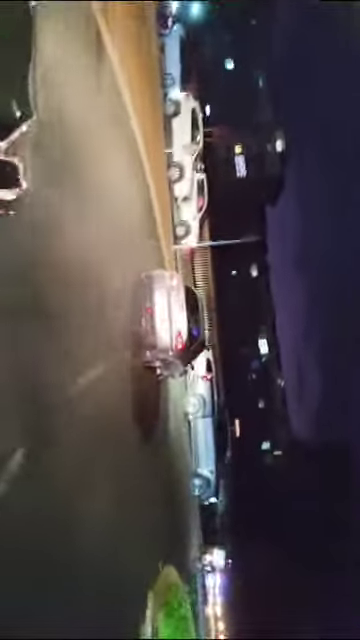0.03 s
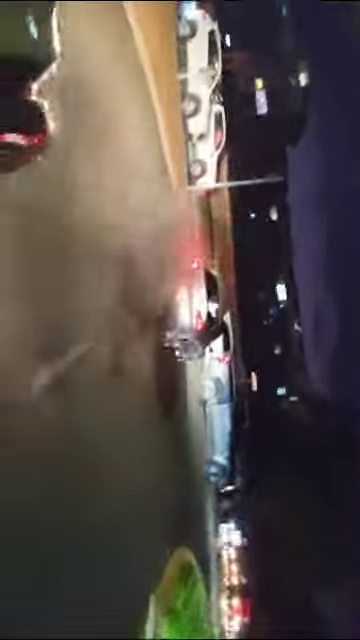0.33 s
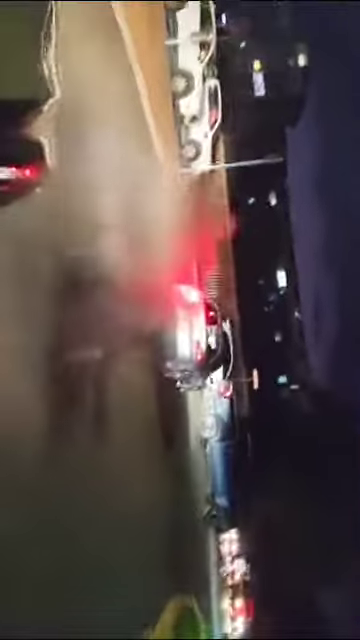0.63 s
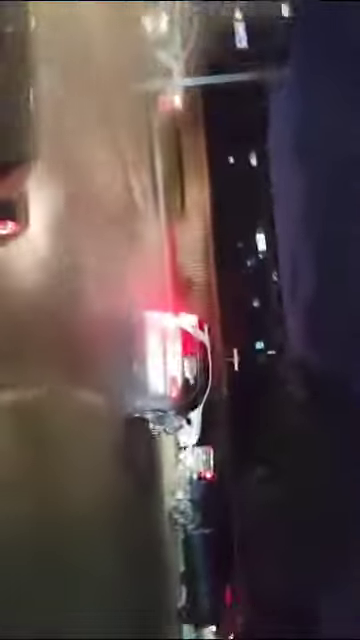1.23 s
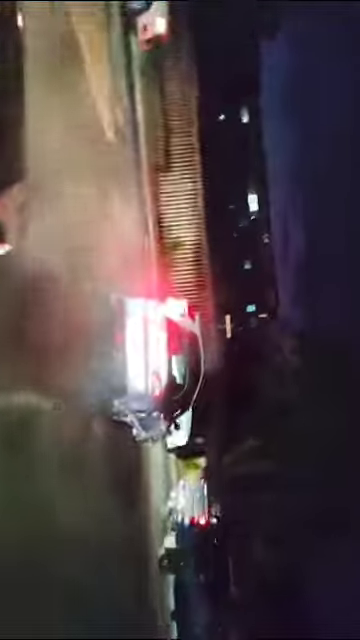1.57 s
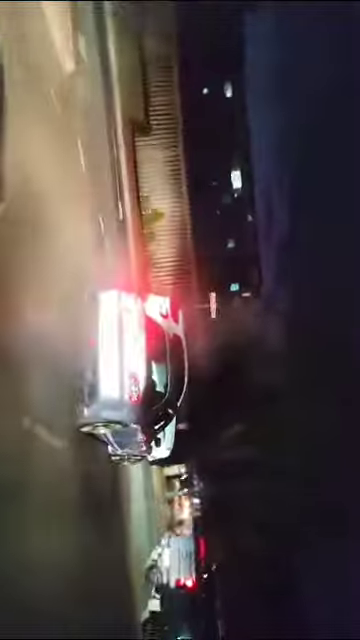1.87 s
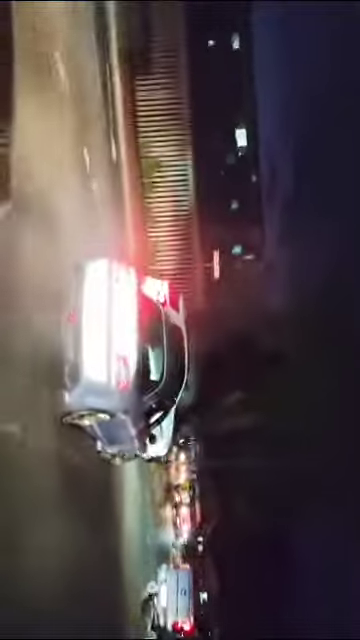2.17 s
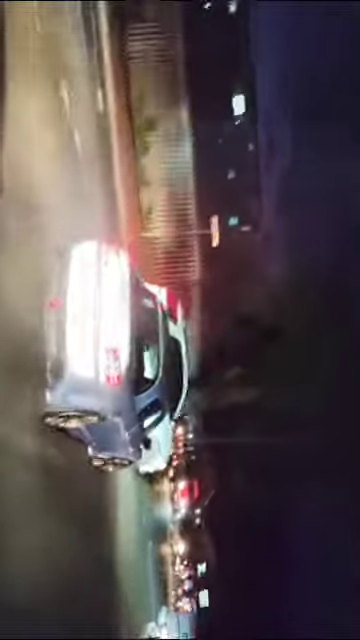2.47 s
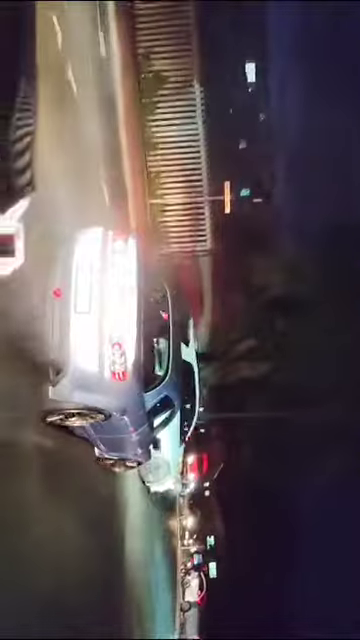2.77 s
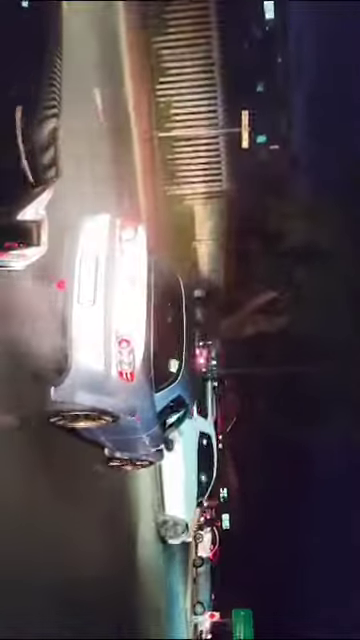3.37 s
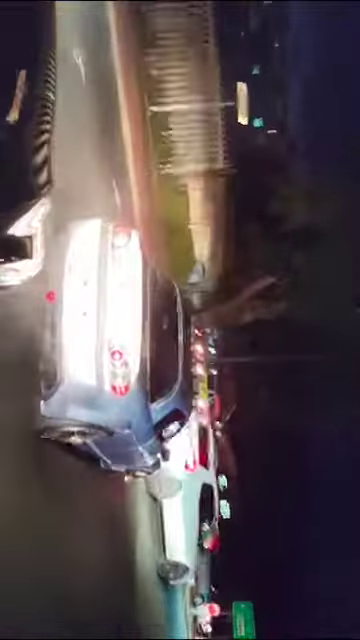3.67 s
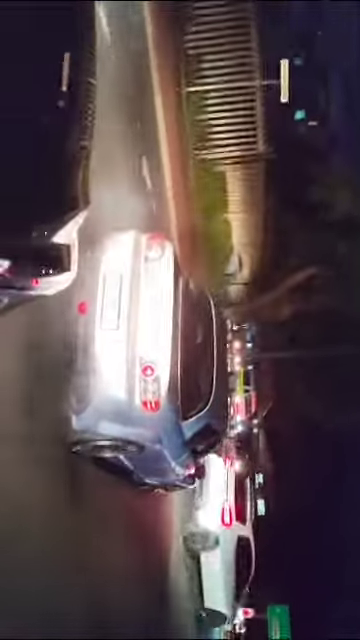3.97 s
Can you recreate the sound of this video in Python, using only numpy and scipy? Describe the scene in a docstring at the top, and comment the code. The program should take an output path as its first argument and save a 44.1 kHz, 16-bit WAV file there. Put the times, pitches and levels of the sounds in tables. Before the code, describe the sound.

Loud car engine revving down with crackling exhaust pops, then pulling hard through two gear changes.

```python
"""Loud exhaust on a night road

City road at night, stereo microphone just behind a car with a very loud exhaust. It revs, backfires,
coasts down with bursts of pops and a burble, then pulls hard through two gears and lifts off.
Firing pulses ring the pipe over its drone, and unburnt fuel pops inside it. The roadside throws
the exhaust back; tyre rush and wind on the microphone run underneath."""
import sys
import numpy as np
from scipy import signal
from scipy.fft import rfft, irfft
from scipy.io import wavfile

SR = 44100
rng = np.random.default_rng(int(sys.argv[2]) if len(sys.argv) > 2 else 0)


def unload_audio(sound):
    """Save the sound as a 16-bit wav file, at the path given as the first command line argument."""
    columns = np.transpose(np.atleast_2d(sound))
    # keep every value between -1 and 1, then stretch to whole-number steps
    steps = np.round(np.clip(columns, -1, 1) * 32767)
    wavfile.write(sys.argv[1], SR, steps.astype(np.int16))


N = 176400

# tyre rush and wind as heard, with the ducking by the recorder's gain control during the pops
# written into the curve: t/s, tyre rush/dB, wind rumble/dB
DUCKED_BED_LEVELS = [(0,-21,-24),(.25,-23,-41),(.46,-21,-22),(1.05,-20.5,-17.5),(1.13,-24,-9.5),(1.21,-32.5,-23),(1.9,-39.5,-20.5),(2.8,-27,-36),(3.17,-26.5,-32),(3.26,-22,-28),(3.55,-24,-33),(3.9,-21,-21.5)]
# colour of the tyre rush: f/Hz, level/dB
TYRE_SPECTRUM = [(60,-61),(300,5),(700,-2),(2000,-8),(4500,-21),(7300,-24.5),(8800,-34.5),(16000,-29.5)]
# colour of the wind on the microphone: f/Hz, level/dB
WIND_SPECTRUM = [(10,-2),(130,-3.5),(300,-7.5),(3000,-54)]
# likeness of the noise in the two channels: f/Hz, correlation
STEREO_LIKENESS = [(30,0.3),(300,0.63),(2500,0.12)]
# roadside echoes: f/Hz, level/dB, time to fall 60 dB/s
STREET_ECHOES = [(100,-20,0.31),(1000,3.5,0.079),(2500,-10.5,0.078),(6000,-13.5,.12)]
# the car's place in the stereo image: t/s, left minus right/dB
CAR_PAN = [(2,0.7),(2.8,-1.5),(4,0.1)]

# spits of gas as the throttle opens: t/s, level/dB, decay/s
SPIT_EVENTS = [(2.868,-17.5,0.11),(3.286,-21.5,0.082)]
# colour of a spit: f/Hz, level/dB
SPIT_SPECTRUM = [(500,-22),(3000,8.5),(8000,-7.5),(16000,-13)]
# the backfire and the two gear-change thuds: t/s, bang/dB, pressure wave/dB, decay/s
BLAST_EVENTS = [(0.176,3.5,4.5,0.024),(3.099,-10.5,-21,0.017),(3.52,-9,-10.5,0.014)]
# colour of the bang: f/Hz, level/dB
BANG_SPECTRUM = [(30,8),(600,3.5),(1500,-10.5),(8000,-26.5)]

# the gas cools while coasting, so pops and burble ring lower: t/s, factor on their resonances
GAS_HEAT = [(1.3,1.127),(2.1,1.04),(2.4,0.98)]
# runs of burble: start/s, end/s, thump/dB, crack/dB, relative size of the weaker pops
BURBLE_RUNS = [(2.0908,2.425,0.5,-11.5,0.24),(2.4543,2.521,-3.5,-13,0.21),(2.5381,2.67,-3,-3,0.27),(2.687,2.765,-3,-5.5,0.13)]
# thump of the burble: f/Hz, level/dB
BURBLE_THUMP_SPECTRUM = [(30,-20.5),(95,7),(165,8.5),(250,-13),(370,0),(470,2),(570,3.5),(690,-0.5),(820,-11),(16000,-87)]
# crack of the burble: f/Hz, level/dB
BURBLE_CRACK_SPECTRUM = [(100,-23),(1350,5.5),(1600,-7),(1950,13),(2300,-0.5),(3300,-8.5),(4400,-16),(7200,-23),(9000,-34)]
# single pops in the pipe: t/s, relative level/dB
POP_EVENTS = [(.1765,-3),(.288,-23),(.305,-15),(1.1708,-12.5),(1.1955,-9.5),(1.3097,-10),(1.3224,-17.5),(1.4049,-14),(1.4185,-13),(1.4327,-14),(1.5046,-18),(1.52,-16),(1.535,-13),(1.5961,-9.5),(1.611,-13),(1.6259,-18),(1.6918,-9),(1.7079,-25),(1.7241,-21.5),(1.7919,-8),(1.8099,-25),(1.827,-22),(1.8988,-11.5),(1.9162,-21),(1.936,-22),(1.9917,-23),(2.0111,-21),(2.0301,-19),(2.0493,-22),(2.4169,-15),(2.5577,-11),(2.7747,-8),(3.286,-10)]
# thump of a pop: f/Hz, level/dB
POP_THUMP_SPECTRUM = [(30,-35),(72,9.5),(160,3),(232,-11),(312,7),(480,-4.5),(690,4),(980,-11.5),(1250,-25),(16000,-76)]
# crack of a pop: f/Hz, level/dB
POP_CRACK_SPECTRUM = [(100,-97),(1250,-6),(1950,10.5),(2850,6.5),(3570,-14.5),(6250,-5.5),(8000,-37),(16000,-36)]

# engine speed, three firings to a turn: t/s, firing rate/Hz
FIRING_RATE = [(0,384.8),(.15,472.7),(.21,472),(.4,412.7),(.6,354.8),(.8,318),(1,278.5),(1.2,242.6),(1.8,171.5),(2.1,150.4),(2.49,125.7),(2.57,152.1),(2.68,165.9),(2.77,168.3),(2.85,204.4),(2.97,259.7),(3.1,332.6),(3.21,304.9),(3.27,302),(3.35,336.3),(3.52,441.6),(3.6,417.7),(3.7,383.4),(4,308.3)]
# drone of the pipe: t/s, firing note/dB, overtones/dB
DRONE_LEVELS = [(.145,-9.5,-38),(.155,-42,-36),(.23,-7,-22),(.26,-26,-40),(.35,-20,-53),(.43,-9.5,-31),(.6,-10.5,-32.5),(.76,-8.5,-14),(.92,-7,-22.5),(.97,-13.5,-22.5),(1.15,-25,-20.5),(1.25,-23,-32),(1.9,-18,-28.5),(2.65,-19,-28.5),(2.85,-35,-37.5),(3.5,-26.5,-27.5),(3.73,-7.5,-26),(3.85,-20,-17)]
# colour of the drone's overtones: f/Hz, level/dB
OVERTONE_SPECTRUM = [(110,4),(220,-5),(330,2.5),(450,-2.5),(540,-12),(630,-1),(1000,-14.5),(1400,-16.5),(2300,-34)]
# throttle, heard as the strength of the firings: t/s, level/dB
THROTTLE_LEVEL = [(0,-9.5),(.147,0),(.153,-37.5),(.2,-32),(.21,-8),(.246,-0.5),(.253,-11),(.6,-48),(2.48,-28),(2.51,-11.5),(2.76,-21),(2.81,-1),(3.1,2.5),(3.125,-60),(3.18,-46),(3.2,-7.5),(3.275,-16.5),(3.29,2),(3.525,5),(3.54,-17),(3.78,-20),(3.89,-3),(4,-7)]
# the three firings of a turn: relative strength, lag/s
CYLINDER_FIRINGS = [(1.01,0),(0.88,.00003),(0.7,-.00002)]
# resonances of the exhaust pipe: f/Hz, level/dB
PIPE_RESPONSE = [(100,-15.5),(170,-8.5),(250,-17),(330,-23.5),(400,-3.5),(440,-13.5),(480,-3.5),(530,-13),(600,-3.5),(680,-16.5),(830,-15),(950,-27.5),(1100,-22),(1280,-21),(1450,-18),(1620,-41),(1950,-15),(2200,-24),(3300,-28.5),(4200,-46),(7200,-55),(8700,-69),(16000,-81)]
# gas rushing out with each firing: f/Hz, level/dB
RASP_SPECTRUM = [(500,-19),(2000,0),(3300,0.5),(4500,-13),(7300,-10),(8700,-28),(16000,-21)]


def amp(db):
    """Decibels to amplitude."""
    return 10 ** (np.asarray(db) / 20)


def unit(x):
    """Scales to rms 1."""
    return x / np.sqrt(np.mean(x ** 2) + 1e-20)


def curve(table, column=1):
    """One column of a time table, per sample."""
    rows = np.array(table)
    return np.interp(np.arange(N) / SR, rows[:, 0], rows[:, column])


def at_hz(table, hz, column=1):
    """One column of a frequency table, interpolated on a log axis."""
    rows = np.array(table)
    return np.interp(np.log(hz + 1), np.log(rows[:, 0] + 1), rows[:, column])


def pan(left_minus_right_db):
    """Left and right gains for a level difference between the channels."""
    return amp(np.vstack([left_minus_right_db, -left_minus_right_db]) / 2)


def ring(spectrum, stretch=1, size=4096):
    """Minimum-phase impulse response with this spectrum, its frequencies multiplied by stretch."""
    hz = abs(np.fft.fftfreq(size, 1 / SR))
    log_gain = np.log(amp(at_hz(spectrum, hz / stretch)))
    return np.fft.ifft(np.exp(np.conj(signal.hilbert(log_gain)))).real[:size // 2]


def through(x, response):
    """Filters x with an impulse response."""
    return signal.oaconvolve(x, response)[:N]


def strike(times, sizes, spectrum):
    """Pressure pulses of the given peak sizes, their resonances following the heat of the gas."""
    out = np.zeros(N)
    stretches = np.interp(times, *np.transpose(GAS_HEAT))
    for start, size, stretch in zip(times, sizes, stretches):
        response = ring(spectrum, stretch)
        part = out[round(start * SR):][:len(response)]
        part += size * response[:len(part)] / abs(response).max()
    return out


def clicks(times, sizes, half_width=8):
    """Band-limited impulses at exact times."""
    centre = np.asarray(times)[:, None] * SR
    index = np.floor(centre).astype(int) + np.arange(1 - half_width, half_width + 1)
    shape = np.sinc(index - centre) * np.sinc((index - centre) / half_width)
    weights = shape * np.asarray(sizes)[:, None]
    return np.bincount(np.clip(index, 0, N).ravel(), weights.ravel(), N + 1)[:N]


def noise(spectrum):
    """Coloured stereo noise of rms 1, the channels most alike in the low mids."""
    hz = np.fft.rfftfreq(N, 1 / SR)
    left, independent = rfft(rng.standard_normal((2, N)))
    likeness = np.clip(at_hz(STEREO_LIKENESS, hz), 0, 1)
    right = likeness * left + np.sqrt(1 - likeness ** 2) * independent
    return unit(irfft(np.array([left, right]) * amp(at_hz(spectrum, hz)), N))


def wander(hz):
    """Random drift of rms 1, mostly slower than hz."""
    lowpass = np.exp(-(np.fft.rfftfreq(N, 1 / SR) / hz) ** 2)
    return unit(irfft(rfft(rng.standard_normal(N)) * lowpass, N))


def tyres_and_wind(flicker_db=1.64, gust_db=2):
    """The bed: flickering tyre rush, ducked during the pops, and lumpy wind on the microphone."""
    rush = amp(curve(DUCKED_BED_LEVELS) + flicker_db * wander(hz=40)) * noise(TYRE_SPECTRUM)
    wind = amp(curve(DUCKED_BED_LEVELS, column=2) + gust_db * wander(hz=18.2)) * noise(WIND_SPECTRUM)
    return rush + wind


def street_echoes(source, first_s=0.0062, echoes_per_s=3000):
    """Scattered returns from the road, barriers and other cars, different in each channel."""
    t = np.arange(SR // 2) / SR
    taps = rng.standard_normal((2, len(t)))
    taps *= (rng.random((2, len(t))) < echoes_per_s / SR) * (t > first_s)
    hz, age, bands = signal.stft(taps, SR, nperseg=256)
    decay_rate = np.log(1000) / at_hz(STREET_ECHOES, hz, column=2)[:, None]
    fade = np.exp(-decay_rate * age) * np.sqrt(decay_rate)  # same energy for any decay time
    bands = bands * amp(at_hz(STREET_ECHOES, hz)[:, None]) * fade
    tails = signal.istft(bands, SR, nperseg=256)[1] / np.linalg.norm(taps[0])
    return np.array([through(source, tail) for tail in tails])


def spits():
    """Short bright bursts of gas from the tailpipe as the throttle opens."""
    t = np.arange(N) / SR
    envelope = sum((t > start) * amp(db) * np.exp(-np.maximum(t - start, 0) / decay_s)
                   for start, db, decay_s in SPIT_EVENTS)
    return envelope * noise(SPIT_SPECTRUM)


def blasts(quarter_wave_s=.016):
    """Backfire and gear-change thuds at close range: a noise burst riding on one slow pressure wave."""
    out, roar = np.zeros((2, N)), noise(BANG_SPECTRUM)
    for start, bang_db, wave_db, decay_s in BLAST_EVENTS:
        age = np.maximum(np.arange(N) / SR - start, 0)
        wave = np.sin(np.pi / 2 * age / quarter_wave_s)
        out += (age > 0) * np.exp(-age / decay_s) * (amp(bang_db) * roar + amp(wave_db) * wave)
    return out


def burble(firing_count, uneven_db=1.5):
    """At low revs the exhaust pops once each turn, and more softly halfway between."""
    t, out = np.arange(N) / SR, np.zeros(N)
    half_turns = 2 * firing_count / len(CYLINDER_FIRINGS)
    for start, end, thump_db, crack_db, weaker in BURBLE_RUNS:
        first, last = np.interp([start, end], t, half_turns)
        times = np.interp(np.arange(first, last), half_turns, t)
        sizes = np.where(np.arange(len(times)) % 2, weaker, 1)
        sizes = sizes * amp(uneven_db * rng.standard_normal(len(times)))
        out += strike(times, sizes * amp(thump_db), BURBLE_THUMP_SPECTRUM)
        out += strike(times, sizes ** 2 * amp(crack_db), BURBLE_CRACK_SPECTRUM)
    return out


def road_bounce(times, sizes, delay_s=0.00123, spread=0.1, reflection=0.65):
    """Each crack reaches the microphone again off the road, never by quite the same distance."""
    arrivals = times + delay_s * (1 + spread * rng.standard_normal(len(times)))
    return strike(arrivals, reflection * sizes, POP_CRACK_SPECTRUM)


def pops(thump_db=2, crack_db=6.5, thump_follows=0.34):
    """Unburnt fuel goes off in the pipe: all pops thump much alike, the strong ones also crack."""
    times, level_db = np.transpose(POP_EVENTS)
    thumps = strike(times, amp(thump_db + thump_follows * level_db), POP_THUMP_SPECTRUM)
    crack_sizes = amp(crack_db + level_db)
    cracks = strike(times, crack_sizes, POP_CRACK_SPECTRUM)
    return thumps + cracks + road_bounce(times, crack_sizes)


def pipe_drone(firing_count, waver_db=1.15, flutter_db=3, between_db=-7, shaft_orders=18):
    """The pipe hums on the firing note, with unsteady overtones and weaker shaft harmonics between."""
    firing_hz, phase = curve(FIRING_RATE), 2 * np.pi * firing_count
    note = amp(curve(DRONE_LEVELS) + waver_db * wander(hz=25.5)) * np.cos(phase)
    overtones = np.zeros(N)
    for ratio in np.arange(1, shaft_orders + 1) / len(CYLINDER_FIRINGS):
        if ratio != 1:
            level_db = at_hz(OVERTONE_SPECTRUM, ratio * firing_hz) + between_db * (ratio % 1 > 0)
            overtones += amp(level_db + flutter_db * wander(hz=16.3)) * np.cos(ratio * phase)
    return np.sqrt(2) * (note + amp(curve(DRONE_LEVELS, column=2)) * overtones)


def firings(firing_count, jitter_s=7e-6, uneven=0.086, rasp_db=-22.5, puff_decay_s=0.0024):
    """Each cylinder sends a pulse down its own length of pipe, with a puff of rushing gas."""
    t, number = np.arange(N) / SR, np.arange(int(firing_count[-1]))
    time_scatter, size_scatter = rng.standard_normal((len(number), 2)).T
    strength, lag_s = np.array(CYLINDER_FIRINGS)[number % len(CYLINDER_FIRINGS)].T
    times = np.interp(number, firing_count, t) + lag_s + jitter_s * time_scatter
    sizes = strength * (1 + uneven * size_scatter)
    throttle = amp(curve(THROTTLE_LEVEL))
    period_samples = SR / curve(FIRING_RATE)  # keeps the pulses' harmonics level as the revs change
    pulses = clicks(times, sizes) * throttle * period_samples / np.sqrt(2)
    puffs = unit(through(clicks(times, sizes ** 2), np.exp(-t[:SR // 20] / puff_decay_s)))
    rasp = amp(rasp_db) * throttle * puffs * noise(RASP_SPECTRUM)
    return through(pulses, ring(PIPE_RESPONSE)), rasp


def scene(right_lag_s=7e-5, gas_pan_db=-3.5):
    """The tailpipe just ahead of the microphone, its sharp sounds echoing, over tyres and wind."""
    firing_count = np.cumsum(curve(FIRING_RATE)) / SR
    pulses, rasp = firings(firing_count)
    sharp = pulses + pops() + burble(firing_count)
    exhaust = sharp + pipe_drone(firing_count)
    right_delay = np.exp(-2j * np.pi * np.fft.rfftfreq(N, 1 / SR) * right_lag_s)
    direct = np.array([exhaust, irfft(rfft(exhaust) * right_delay, N)])
    gas = (rasp + spits()) * pan(gas_pan_db)
    car = direct + gas + street_echoes(sharp)
    return car * pan(curve(CAR_PAN)) + blasts() + tyres_and_wind()


def record(dry, gain_db=-1.5, ceiling=0.8, top_hz=15900):
    """The recorder rounds off the loudest peaks, then cuts the highest treble."""
    driven = dry * amp(gain_db) / ceiling
    rounded = ceiling * driven / (1 + driven ** 6) ** (1 / 6)
    lowpass = signal.firwin(511, top_hz, window=("kaiser", 9), fs=SR)
    return signal.oaconvolve(rounded, lowpass[None], "same")


dry = scene()
out = record(dry)
unload_audio(out)
```